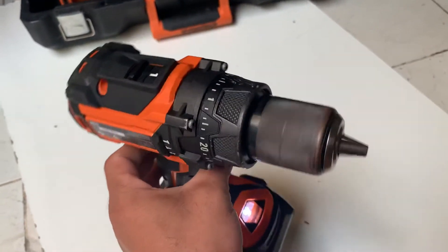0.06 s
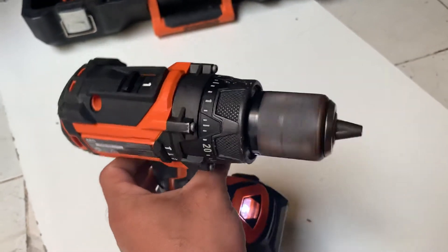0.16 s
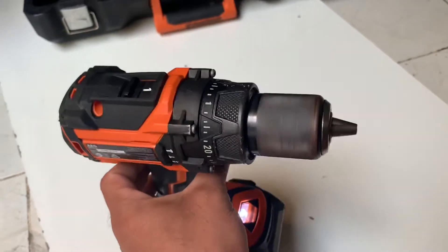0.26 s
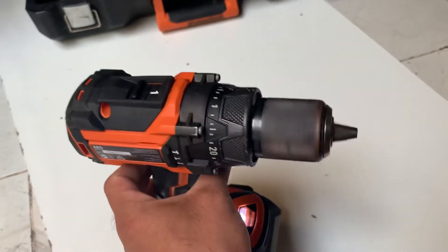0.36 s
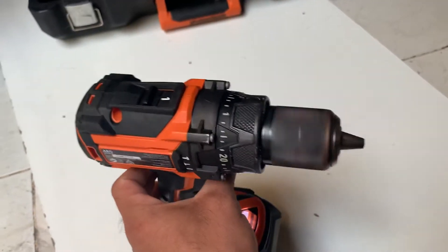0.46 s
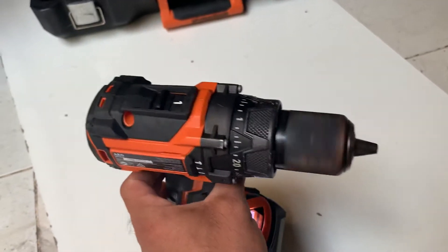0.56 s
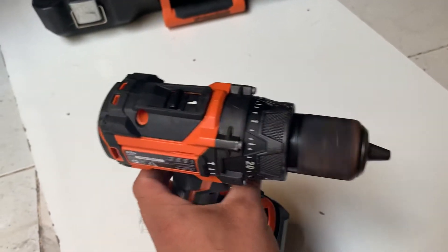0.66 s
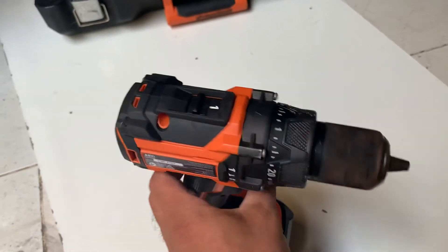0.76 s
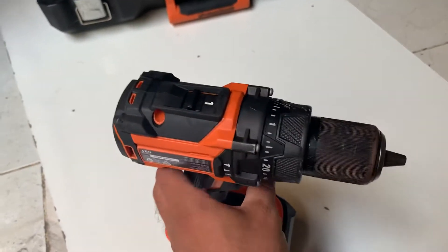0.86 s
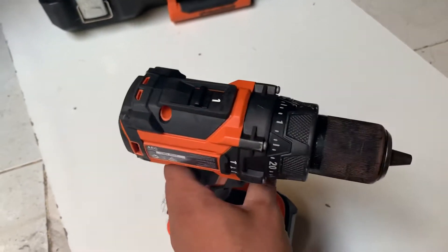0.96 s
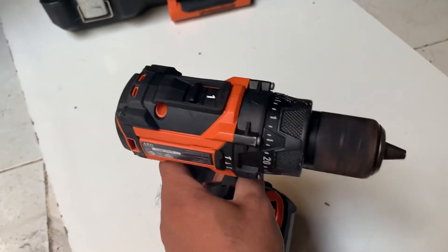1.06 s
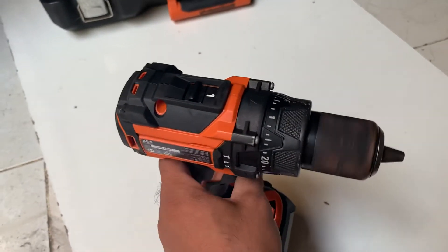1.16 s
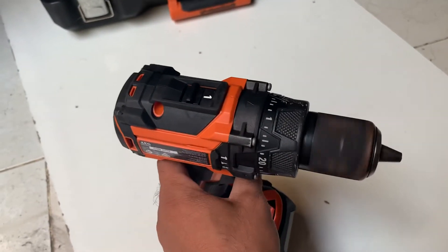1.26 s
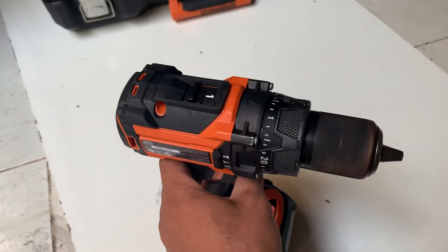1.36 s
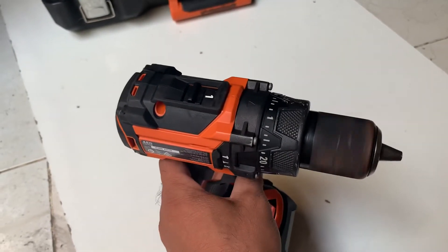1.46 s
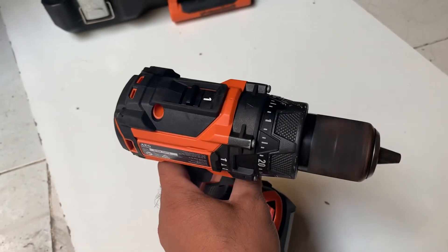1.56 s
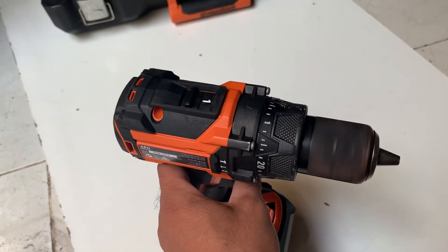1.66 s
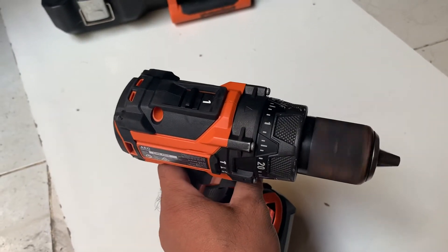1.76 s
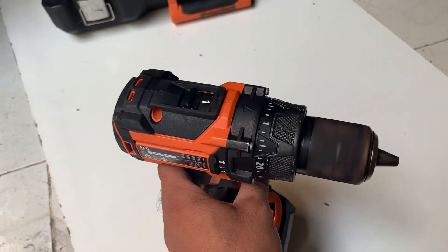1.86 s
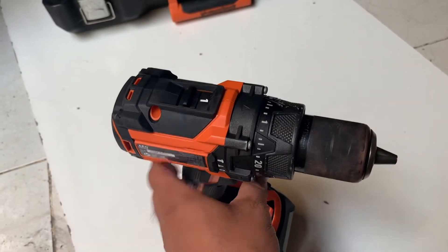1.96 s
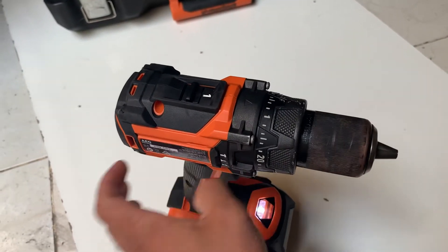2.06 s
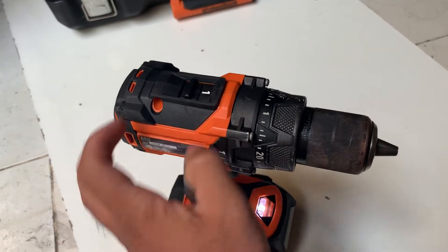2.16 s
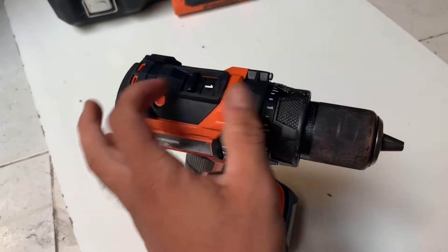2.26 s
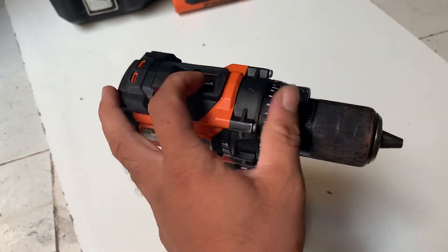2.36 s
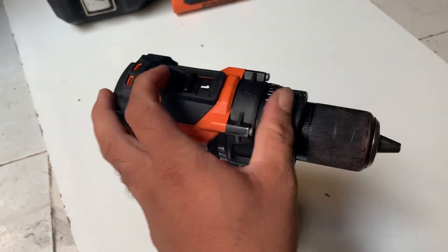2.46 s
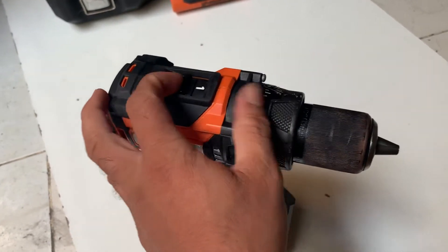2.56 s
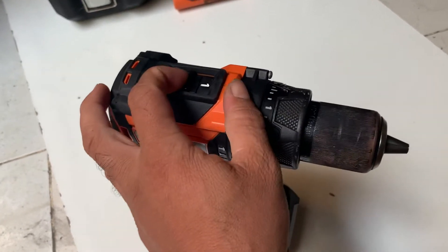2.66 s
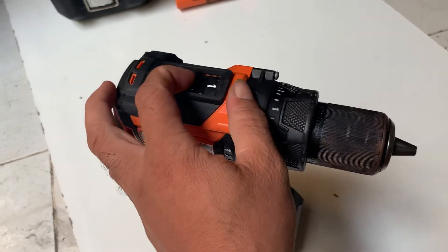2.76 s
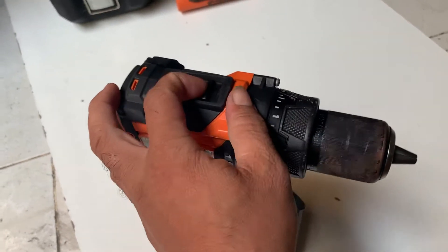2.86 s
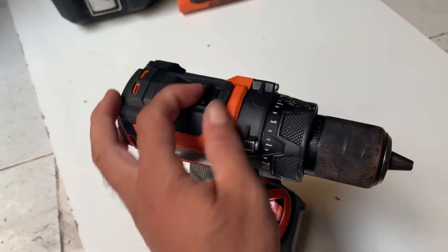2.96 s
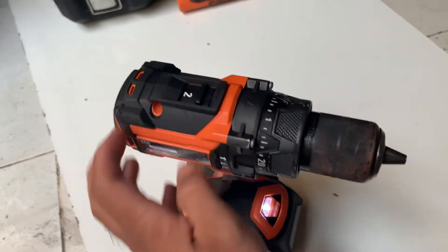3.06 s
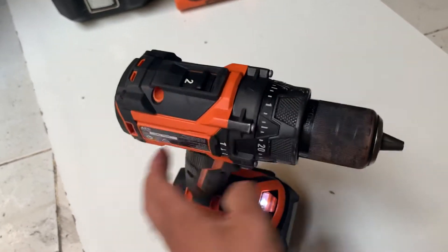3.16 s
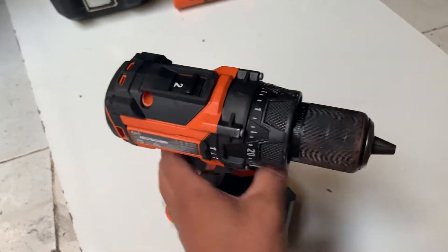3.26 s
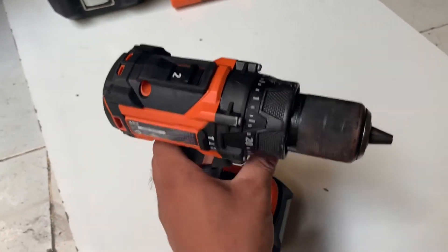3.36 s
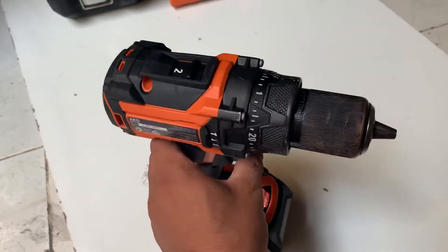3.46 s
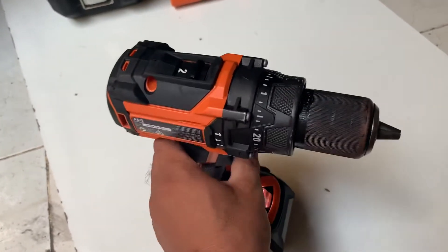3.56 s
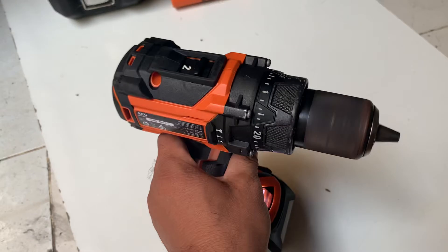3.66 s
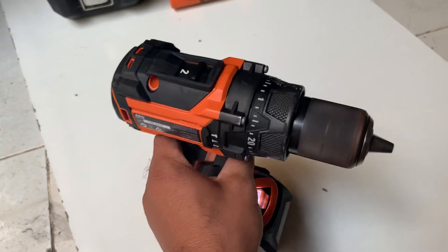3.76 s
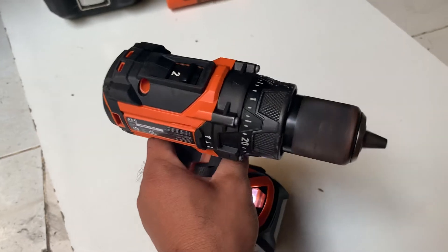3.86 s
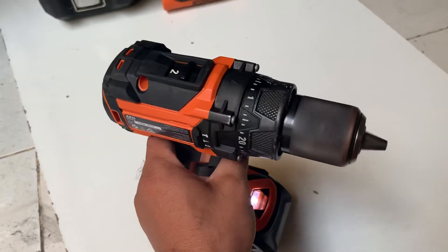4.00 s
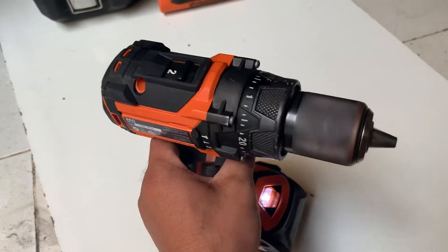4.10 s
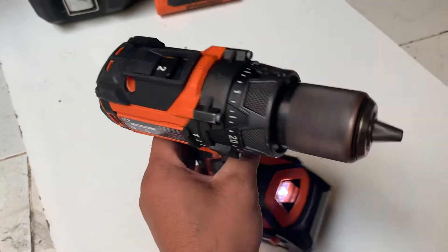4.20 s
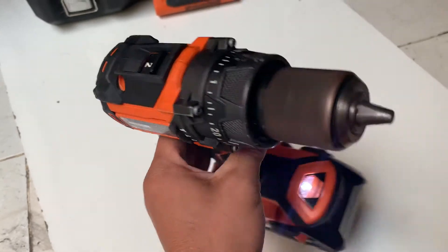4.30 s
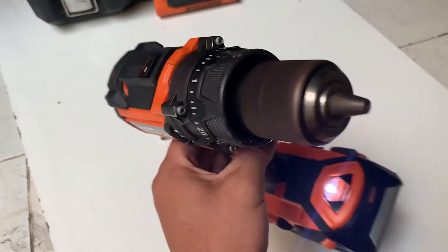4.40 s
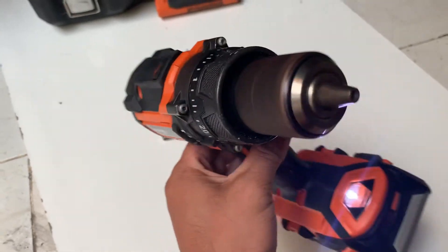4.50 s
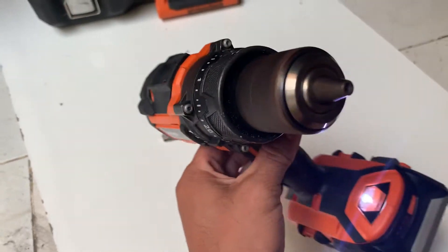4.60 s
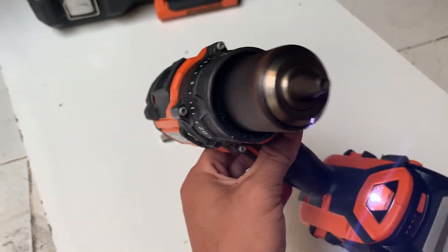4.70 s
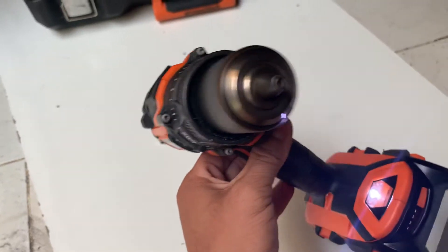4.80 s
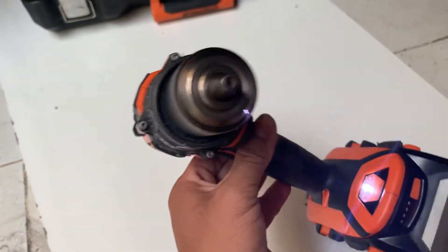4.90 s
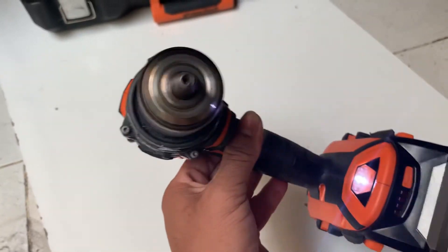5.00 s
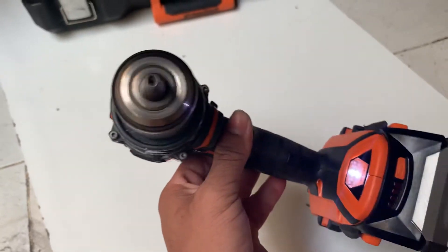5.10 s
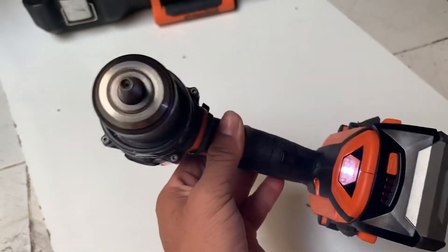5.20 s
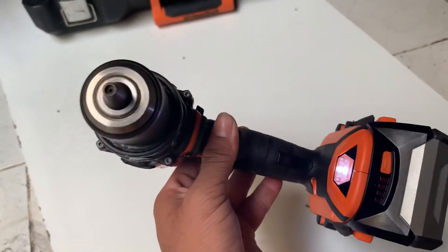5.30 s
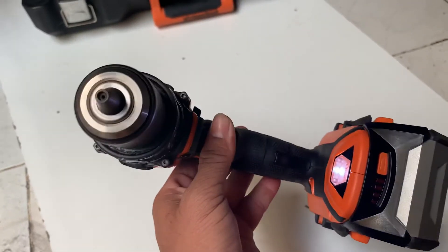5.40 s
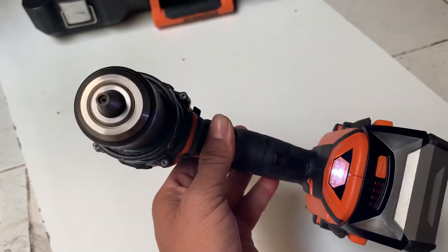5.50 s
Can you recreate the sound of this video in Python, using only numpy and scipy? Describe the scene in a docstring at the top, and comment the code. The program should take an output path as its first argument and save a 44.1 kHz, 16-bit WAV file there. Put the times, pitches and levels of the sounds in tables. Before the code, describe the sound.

A cordless drill whines steadily, brakes, runs and brakes again, then after handling knocks and a sharp selector click whines on to the end.

```python
"""Close to a stereo microphone in a small room, a cordless drill with an empty chuck is already spinning; it is
released and braked, runs and brakes again, and after a pause starts a third run that lasts to the end.
Tones at multiples of the motor speed whine over shaped gear noise; the housing's modes ring as orders sweep past.
The hand knocks and rustles, mostly between the last two runs, where noise bursts snap the gear selector over.
Faint rumble, drone and air lie behind it all; the third run's tone shifts as the chuck swings round."""
import sys
import numpy as np
from scipy import signal
from scipy.fft import rfft, irfft, next_fast_len
from scipy.io import wavfile
from scipy.ndimage import uniform_filter1d, map_coordinates

SR = 44100
rng = np.random.default_rng(int(sys.argv[2]) if len(sys.argv) > 2 else 0)


def file_out(sig):
    """Save sig as 16-bit WAV at sys.argv[1]."""
    # one column per channel
    cols = np.atleast_2d(sig).T
    # limit, then scale
    lim = np.clip(cols, -1, 1)
    pcm = np.round(lim * 32767).astype(np.int16)
    wavfile.write(sys.argv[1], SR, pcm)


N = 244314
TIME = np.arange(N) / SR  # s

# Trigger pulls. Each row: pressed, released and brake engaged in seconds, top speed in turns per s,
# then relative levels of gear rush, gear hiss, hum and cogging in dB.
TRIGGER_PULLS = [(-1, .642, .7, 406, -39.8, -41, -39, -39),
                 (1.048, 1.812, 1.879, 405.8, -40.8, -43.2, -40.7, -43),
                 (3.6, 6, 6.06, 403.6, -37.6, -38.7, -38.3, -39.8)]
# The rotor's whine at the two microphone ports as the drill moves and interference makes quick dips, one list
# for each pull. Each row: time in seconds, relative left and right level in dB, phase lead of the left in radians.
ROTOR_AT_PORTS = [
    [(0.03, -20, -15.5, 2.6), (0.2, -23.5, -17.5, 3.0), (0.29, -29.0, -25.5, 3.4),
     (0.37, -36.0, -28.5, 4.8), (0.46, -28.0, -25.0, 7.1), (0.62, -24.0, -23.5, 7.6),
     (0.71, -18, -16.5, 8.3)],
    [(1.11, -18, -19, 8.3), (1.16, -19.5, -23.0, 7.5), (1.24, -21.0, -21.5, 8.1), (1.275, -21, -26, 9.1),
     (1.35, -21.0, -31.0, 8.3), (1.6, -21.5, -25.0, 7.7), (1.79, -21.0, -25.0, 7.8), (1.89, -20, -20, 8.2)],
    [(3.645, -19, -22, 8.2), (3.67, -22, -25, 8.2), (3.7, -15.5, -18, 8), (3.765, -20, -29, 7.8),
     (3.795, -19.5, -20, 8), (3.83, -19.5, -28, 8.4), (3.87, -18.5, -20, 8.6), (4.05, -20.0, -32.0, 8.1),
     (4.16, -26.5, -30.5, 6.3), (4.23, -36.0, -30.0, 3.3), (4.27, -29.5, -22.5, 2.5),
     (4.43, -24.0, -20.0, 2.5), (4.75, -26.0, -27.5, 1.5), (4.87, -25.0, -27.0, 1.3),
     (5, -24.5, -25.0, 2.1), (5.23, -25.5, -21.0, 2.3), (5.33, -27.0, -25.0, 2.3),
     (5.51, -26.0, -21.5, 2.3)],
]
# How well the housing radiates the rotor's whine. Each row: frequency in Hz, gain in dB.
ROTOR_RADIATION = [(1500, -45), (2050, -22), (2300, -13), (2480, -9), (2610, -9), (2730, 1.5), (2850, 4.5),
                   (2970, 0), (3400, 0)]
# Tooth mesh tone. Each row: time in seconds, relative level in dB.
MESH_LEVEL = [(0.12, -41.5), (0.36, -45), (0.6, -43), (1.28, -42.5), (1.43, -36.0), (1.78, -36.0),
              (3.77, -33), (3.85, -40), (3.92, -35), (4.14, -32.5), (4.34, -32.0), (4.56, -39.0),
              (4.84, -31.0), (5.02, -37.5), (5.13, -33.5), (5.45, -38.0)]
# Planet gear tone. Each row: time in seconds, level in dB before the gears' running gain.
PLANET_TONE_LEVEL = [(1.8, -53), (4.6, -49), (4.655, -38), (4.7, -37), (4.755, -49), (4.79, -36),
                     (4.82, -36), (4.85, -47), (5.04, -47), (5.09, -42), (5.23, -50), (5.27, -41),
                     (5.34, -37.5), (5.43, -42), (5.5, -48)]
# Ring gear tone. Each row: time in seconds, level in dB before the gears' running gain.
RING_TONE_LEVEL = [(1.8, -48), (3.8, -41), (4.24, -38), (4.4, -48)]
# Weaker lines. Each row: multiple of the motor speed, level in dB before the running gain, roughness 0-1.
WEAK_ORDERS = [(2.57, -55, .6), (3, -53, .3), (3.47, -55, .6), (5, -53, .3), (7, -58, .4), (9.3, -57, .5),
               (10, -57, .4), (11, -56, .4), (12, -44, .35), (15, -60, .4), (16, -49, .2), (20, -47, .25),
               (22.5, -63, .4), (24, -59, .2), (32, -56.5, .2), (38, -65, .3)]
# Torque ripple that shakes the housing. Each row: multiple of the motor speed, drive in dB, roughness 0-1.
RIPPLE_ORDERS = [(4, -28.5, .22), (12, -42, .6), (16, -29, .35), (19, -38, .5), (24, -45, .7)]
# Modes of the drill's housing. Each row: frequency in Hz, width in Hz, gain in dB.
HOUSING_MODES = [(760, 220, 0), (1020, 260, 0), (1380, 280, -9), (2510, 120, -9), (2780, 130, 1),
                 (2900, 140, 1), (3050, 130, 0), (4080, 400, -3), (4750, 400, 0), (5750, 500, -7),
                 (6950, 600, 0)]
# Spectrum of the gear rush. Each row: frequency in Hz, relative density in dB per Hz.
RUSH_SPECTRUM = [(150, -12), (260, -5), (350, -6), (520, -22), (700, -4.5), (950, 2), (1350, -2),
                 (1700, 0.5), (2400, -0.5), (2950, 1.5), (3500, -6.5), (4600, -23)]
# Spectrum of the gear hiss, with a hole near 11.6 kHz as lossy coding leaves.
# Each row: frequency in Hz, relative density in dB per Hz.
HISS_SPECTRUM = [(2500, -25), (3500, -5.5), (4200, 3.5), (4900, 1.5), (5500, -3), (7200, -7), (8200, -6),
                 (9300, -8.5), (10500, -11), (11600, -29), (14200, -17), (15600, -39)]
# Spectrum of gears clattering under torque. Each row: frequency in Hz, relative density in dB per Hz.
CLATTER_SPECTRUM = [(200, -19), (400, 0.5), (620, -9), (900, 4.5), (1300, -5), (2000, -7), (2900, 6),
                    (3500, -7), (4500, -3), (6500, -11), (10000, -26.5), (15000, -86)]
# Short bursts near 3 kHz as the motor starts, brakes and stops. Each row: time in seconds, relative level in dB.
START_STOP_BURSTS = [(0.698, -28), (0.754, -26), (0.769, -22), (0.783, -27), (1.064, -26), (1.073, -20.5),
                     (1.878, -25), (1.902, -25), (1.932, -28), (1.949, -24), (1.962, -25), (3.601, -34),
                     (3.609, -25), (3.620, -16)]
# Spectrum of the short bursts. Each row: frequency in Hz, relative density in dB per Hz.
BURST_SPECTRUM = [(400, -21.5), (900, -9.5), (1400, -27.5), (2400, -18.5), (2900, 8), (3400, -5.5),
                  (4700, -14), (9000, -27.5), (15000, -46)]
# The selector scrapes, snaps home and settles.
# Each row: start in seconds, relative level in dB, t60 in seconds, brightness in dB per octave.
SELECTOR_CONTACTS = [(2.823, -32, .05, -1), (2.827, -26, .02, 0), (2.8294, -13, .007, 2),
                     (2.8308, -14, .019, -1.5), (2.84, -35, .07, -1.5)]
# The selector's plastic shell. Each row: frequency in Hz, relative density in dB per Hz.
SELECTOR_SHELL = [(350, -50), (620, -28), (730, -7), (820, 3), (1000, 2), (1320, -6), (1600, -5),
                  (2050, -8), (2600, -4), (4300, -3), (7000, -11), (9400, -9), (12000, -17), (15500, -16)]
# Knocks of the hand, from dull thuds to light taps. Each row: start in seconds, level in dB, pitch in Hz.
HAND_KNOCKS = [(0.826, -39, 300), (0.84, -37, 110), (0.883, -44, 300), (0.958, -43, 280), (1.006, -40, 270),
               (1.03, -38, 90), (2.04, -40, 80), (2.086, -43, 320), (2.117, -39, 430), (2.127, -35, 380),
               (2.13, -35, 65), (2.164, -44, 320), (2.277, -39, 520), (2.302, -37, 150), (2.318, -34, 300),
               (2.344, -32, 340), (2.46, -41, 350), (2.506, -36, 270), (2.96, -36, 100), (3.074, -41, 420),
               (3.1, -33, 200), (3.133, -33, 170), (3.182, -32, 210), (3.24, -34, 100), (3.366, -40, 430),
               (3.413, -35, 180), (3.47, -34, 200), (3.483, -36, 110), (4.342, -28, 70), (4.584, -37, 270),
               (4.957, -39, 170), (5.288, -38, 55), (5.331, -33, 120), (5.358, -31, 290), (5.399, -39, 240)]
# The hand slides over the grip. Each row: start in seconds, length in seconds, rustle in dB.
HAND_SLIDES = [(2.08, .25, -55), (2.37, .17, -55), (3.03, .17, -53), (3.29, .2, -53)]
# Spectrum of the rustle. Each row: frequency in Hz, relative density in dB per Hz.
RUSTLE_SPECTRUM = [(150, -8), (270, 4), (450, -5), (550, -7), (660, -11), (820, -19), (1200, -34), (5000, -75)]
# Skin drags over the rubber grip. Each row: start in seconds, length in seconds, level in dB.
SKIN_SCRAPES = [(1.98, .14, -54), (2.14, .16, -52.5)]
# The grip's resonances. Each row: frequency in Hz, relative density in dB per Hz.
GRIP_RESONANCES = [(380, -22), (500, -7), (545, 0), (620, -13), (720, -16), (795, -7), (900, -20),
                   (1300, -34), (4000, -70)]
# Swells of the low background. Each row: middle and half length in seconds, rumble and drone rise in dB.
BACKGROUND_SWELLS = [(0.85, .2, 2, 2), (1.83, .07, 6.5, 1), (3.2, .5, 0, 8.5), (5.2, .4, -3, -2)]
# Spectra of rumble, drone and air. Each row: frequency in Hz, relative density in dB per Hz.
RUMBLE_SPECTRUM = [(15, -33), (35, -7.5), (55, 1), (85, 1.5), (125, -5.5), (250, -45), (1000, -89)]
DRONE_SPECTRUM = [(80, -25), (125, -6), (150, -5), (172, 0), (205, -10), (280, -15), (450, -32), (1500, -80)]
AIR_SPECTRUM = [(100, -5.5), (700, 4), (1500, -0.5), (4300, -9.5), (7000, -20), (10000, -33), (14000, -49)]
# The small room's decay. Each row: frequency in Hz, t60 in seconds.
ROOM_DECAY = [(200, 0.48), (1000, 0.19), (4000, 0.23), (12000, 0.15)]

# multiples of the motor speed for the leading tones
ROTOR, COG, COG_SIDEBAND, PLANET, RING, TEETH = 8, 4, 4.08, 2.883, 10.21, 19
# the motor nears its top speed quickly, then creeps up the last few per cent
SPIN_UP_S, CREEP_SHARE, CREEP_S = .046, .055, .11
# released, it coasts; then the brake bites and at last the spindle locks (rates in turns per s per s)
COAST_RATE, BRAKE_RATE, STOP_S, LOCK_S = 500, 2480, .104, .023
# the rotor's whine follows the current: weak while coasting, strong while braking
COAST_DB, BRAKE_DB = -10, 1
HUM_RISE_S = .17  # the hum builds up after each pull
# the chuck swings round to face the microphone; full change of each layer (the octave's adds to the hum's)
TURN_START_S, TURN_LENGTH_S = 4.3, .9
TURN_RUSH_DB, TURN_HISS_DB, TURN_HUM_DB, TURN_OCTAVE_DB, TURN_COG_DB = -3.5, -3.6, -4, -3, 2
LEAK_DB = -20  # ripple that escapes between the housing's modes
SLIDE_FADE_S, GRIP_DB, SLIPS_PER_S = .02, -62, 750
BUMP_CYCLES = .36  # the palm damps each knock within a fraction of a cycle
RUMBLE_DB, DRONE_DB, AIR_DB = -47.8, -49.3, -58
TOP_HZ = 15500


def motor():
    """Speed in turns per s, shaft angle, share of full speed and torque (speeding up or braking)."""
    pressed, released, braked, top, *_ = per_pull()
    age = TIME - pressed
    driven = top * np.tanh(age / SPIN_UP_S) * (1 - CREEP_SHARE * np.exp(-age / CREEP_S))
    coast_loss = COAST_RATE * np.clip(TIME - released, 0, braked - released)
    brake_loss = BRAKE_RATE * np.maximum(TIME - braked, 0)
    lock = np.clip((braked + STOP_S - TIME) / LOCK_S, 0, 1)
    speed = np.maximum(driven - coast_loss - brake_loss, 0) * lock
    pace = np.clip(speed / speed.max(), 0, 1)
    change = np.abs(uniform_filter1d(np.gradient(pace) * SR, size=500))
    torque = np.tanh(change / 5.7) * np.minimum(pace / 0.53, 1)
    # the shaft turns less evenly under torque
    flutter = .00025 * wobble(14) + .0005 * wobble(160) + .006 * torque * wobble(500)
    angle = 2 * np.pi * np.cumsum(speed * (1 + flutter)) / SR
    return speed, angle, pace, torque


def per_pull():
    """For each column of the pulls, the value of the latest pull at every sample."""
    rows = np.array(TRIGGER_PULLS)
    latest = np.searchsorted(rows[:, 0], TIME, side="right") - 1
    return rows[latest].T


def current_db():
    """How the motor current changes the whine: it drops out on release and surges in the brake."""
    _, released, braked, *_ = per_pull()
    steps = np.select([TIME > braked, TIME > released], [BRAKE_DB, COAST_DB], 0.)
    return uniform_filter1d(steps, size=600)


def turned():
    """How far the chuck has swung towards the microphone, 0-1."""
    return np.clip((TIME - TURN_START_S) / TURN_LENGTH_S, 0, 1)


def rotor(speed, angle, pace):
    """The main whine, driven by the current; it flares as it sweeps through the strongest resonance."""
    left_db, right_db, lead = curves(np.vstack(ROTOR_AT_PORTS))
    drive_db = current_db() + along(ROTOR_RADIATION, ROTOR * speed)
    tone = amp(drive_db) * line(ROTOR * angle, rough=0.057, lead=lead, drift_db=0.25)
    # random flicker for the tone beating against its own echo until the speed settles
    beating_db = np.tanh((1 - pace) / .04) * (2.8 * np.array([wobble(110), wobble(110)]) - .7)
    port_gain = amp(np.array([left_db, right_db]) + beating_db + .1)
    return port_gain * np.minimum(2 * pace, 1) * tone


def whine(angle, pace, torque):
    """Hum, cogging and gear tones, all locked to the shaft."""
    pressed, *_, hum_db, cog_db = per_pull()
    hum_rise = 1 - np.exp((pressed - TIME) / HUM_RISE_S)
    hum_db = hum_db + TURN_HUM_DB * turned()
    octave_db = hum_db - 9.5 + TURN_OCTAVE_DB * turned()
    cog_db = cog_db + TURN_COG_DB * turned()
    mesh_db, = curves(np.vstack(MESH_LEVEL))
    mesh_db = mesh_db + 2.3 + .7 * np.minimum(current_db(), 0)
    planet_db, = curves(PLANET_TONE_LEVEL)
    ring_db, = curves(RING_TONE_LEVEL)
    tones = amp(hum_db + .3) * hum_rise * line(angle, rough=0.24, lead=0.27, drift_db=.7)
    tones += amp(octave_db) * line(2 * angle, rough=.2, lead=.15, drift_db=1)
    tones += amp(cog_db - 1.5) * line(COG * angle, rough=0.36, lead=wobble(1.97), drift_db=1.2)
    tones += amp(cog_db - 2.2) * line(COG_SIDEBAND * angle, rough=3.9, lead=4.3 * wobble(3), drift_db=2.5)
    tones += amp(planet_db) * line(PLANET * angle, rough=.4, lead=.5, drift_db=.7)
    tones += amp(ring_db) * line(RING * angle, rough=.3, lead=0.42 + .5 * wobble(2.2), drift_db=1)
    tones += amp(mesh_db) * line(TEETH * angle, rough=.18, lead=1.9 + .15 * wobble(2), drift_db=.6)
    for order, db, rough in WEAK_ORDERS:
        # short waves arrive at the two ports further out of step
        lead = min(order / 14, 1) * (1 + .4 * wobble(1.5))
        tones += amp(db) * line(order * angle, rough, lead=lead, drift_db=1.1)
    # the fine lines only form once the gears run freely
    return pace ** 3 * (1 - torque) ** 1.5 * tones


def ripple(speed, angle, torque):
    """While the motor speeds up or brakes, each order chirps through the housing's modes."""
    drive = np.zeros((2, N))
    for order, db, rough in RIPPLE_ORDERS:
        radiated = 1 / (1 + (650 / (order * speed + 1)) ** 6)  # little radiates below 650 Hz
        tone = line(order * angle, rough, lead=1.1, drift_db=1.2)
        drive += amp(db + 1.6 * wobble(140)) * radiated * tone
    drive *= torque ** 1.3
    return housing(drive) + amp(LEAK_DB) * drive


def housing(x):
    """The housing's modes ring on after a tone has swept past them, and beat against it."""
    def response(f):
        total = 0
        for k, (hz, width, db) in enumerate(HOUSING_MODES):
            mode = 1j * f * width / (hz ** 2 - f ** 2 + 1j * f * width)
            total = total + (-1) ** k * amp(db) * mode
        return total
    return filtered(x, response)


def gears(angle, pace, torque):
    """Teeth rub and tick once a turn; under torque they clatter; short bursts mark starts and stops."""
    *_, rush_db, hiss_db, _, _ = per_pull()
    rush_db = rush_db + TURN_RUSH_DB * turned() + 2.0
    hiss_db = hiss_db + TURN_HISS_DB * turned() + 6.0
    grain = amp(0.75 * wobble(900) + 1.4 * wobble(40) + 0.63 * np.cos(angle))
    rush = amp(rush_db) * noise(RUSH_SPECTRUM, alike=0.033)
    rush = rush + amp(hiss_db) * noise(HISS_SPECTRUM, alike=.05)
    chatter = unit(amp(3.3 * wobble(400)))
    clatter = noise(CLATTER_SPECTRUM, alike=.3, envelope=amp(-28.5) * chatter * torque ** 1.6)
    burst_envelope = sum(amp(db) * burst(s, t60=0.027) for s, db in START_STOP_BURSTS)
    short_bursts = noise(BURST_SPECTRUM, alike=0.31, envelope=uniform_filter1d(burst_envelope, size=180))
    rubbing = pace ** 1.4
    balance = amp([[-.7], [.7]])  # the rush leans to the right
    return rubbing * grain * rush * balance + clatter + short_bursts


def selector():
    """The plastic slider's contacts excite many short modes of the shell."""
    out = np.zeros((2, N))
    for s, db, t60, bright_db in SELECTOR_CONTACTS:
        colour = [(hz, level + bright_db * np.log2(hz)) for hz, level in SELECTOR_SHELL]
        out += noise(colour, alike=0.25, envelope=amp(db - 4) * burst(s, t60))
    return out


def hand():
    """Knocks, short scrapes and a grainy rustle as the grip shifts."""
    knocks = sum(amp(db) * knock(s, hz) for s, db, hz in HAND_KNOCKS)
    rustle_envelope = (amp(GRIP_DB) + strokes(HAND_SLIDES)) * slips(SLIPS_PER_S)
    rustle = noise(RUSTLE_SPECTRUM, alike=0.95, envelope=rustle_envelope)
    scrape = noise(GRIP_RESONANCES, alike=.9, envelope=strokes(SKIN_SCRAPES) * slips(SLIPS_PER_S))
    return knocks + scrape + rustle


def knock(start, hz):
    """One heavily damped swing of the grip, peak near 1."""
    cycles = np.arange(SR // 10) / SR * hz
    envelope = cycles / BUMP_CYCLES * np.exp(1 - cycles / BUMP_CYCLES)
    swing = np.sin(2 * np.pi * cycles) * envelope
    return np.pad(swing, (int(start * SR), N))[:N]


def strokes(rows):
    """The envelope of sliding contacts that fade in and out."""
    total = 0
    for s, length, db in rows:
        to_edge = np.minimum(TIME - s, s + length - TIME)
        total = total + amp(db) * np.clip(to_edge / SLIDE_FADE_S, 0, 1)
    return total


def slips(rate):
    """Tiny slips of random size at random moments, rms 1."""
    return unit((rng.random(N) < rate / SR) * rng.uniform(.3, 1, N))


def background():
    """Low rumble, a distant drone and faint air, each made of coloured noise."""
    rise_db = np.zeros((2, N))
    for s, half_length, *gains_db in BACKGROUND_SWELLS:
        rise_db += np.outer(gains_db, np.exp(-((TIME - s) / half_length) ** 2))
    rumble = amp(RUMBLE_DB + rise_db[0] + 2.3 * wobble(11)) * noise(RUMBLE_SPECTRUM, alike=0.6)
    drone = amp(DRONE_DB + rise_db[1] + 1.2 * wobble(12)) * noise(DRONE_SPECTRUM, alike=.05)
    air = amp(AIR_DB) * noise(AIR_SPECTRUM, alike=0.044)
    return rumble + drone + air


def room(x):
    """A short diffuse tail from hard walls: noise that decays at its own rate in each band."""
    hz, t, z = signal.stft(rng.standard_normal((2, SR // 2)), SR, nperseg=256)
    decay = amp(-60 * t / along(ROOM_DECAY, hz)[:, None])
    tail = signal.istft(z * decay, SR, nperseg=256)[1]
    return signal.fftconvolve(x, tail / np.linalg.norm(tail[0]), axes=1)[:, :N]


def line(angle, rough, lead, drift_db):
    """A stereo tone of rms 1 with a noisy skirt; its strength drifts at each port."""
    skirt = wobble(70) + 1j * wobble(70) + .5 * (wobble(450) + 1j * wobble(450))
    tone = (1 + rough * skirt / np.sqrt(2)) * np.exp(1j * (angle + 2 * np.pi * rng.random()))
    ports = [amp(drift_db * wobble(2.4)) * (tone * np.exp(.5j * side * lead)).real for side in (1, -1)]
    return unit(np.array(ports))


def noise(spectrum, alike, envelope=1):
    """Stereo noise, rms 1 if unshaped, enveloped before colouring; alike is the left-right correlation."""
    colour = lambda hz: unit(amp(along(spectrum, hz)))
    mid, side = filtered(envelope * rng.standard_normal((2, N)), colour)
    turn = np.arccos(np.clip(alike, -1, 1)) / 2
    return np.cos(turn) * mid + np.sin(turn) * np.array([side, -side])


def burst(start, t60):
    """An envelope that starts at once and dies away."""
    age = TIME - start
    return (age >= 0) * amp(-60 * np.abs(age) / t60)


def wobble(rate):
    """A smooth random curve, rate knots a second."""
    knots = rng.standard_normal(int(N * rate / SR) + 4)
    grid = np.arange(0, len(knots) - 1, .1)
    return np.interp(TIME * rate, grid, map_coordinates(knots, [grid]))


def filtered(x, response):
    """x times a response of frequency."""
    m = next_fast_len(N + SR // 2)
    return irfft(rfft(x, m) * response(np.fft.rfftfreq(m, 1 / SR)), m)[..., :N]


def along(points, hz):
    """Read (Hz, value) points on a log frequency axis."""
    f, v = np.transpose(points)
    return np.interp(np.log(hz + 1), np.log(f + 1), v)


def curves(rows):
    """One value per sample for each column after the time."""
    s, *cols = np.transpose(rows)
    return [np.interp(TIME, s, c) for c in cols]


def amp(db):
    """Amplitude of a level in dB."""
    return 10 ** (np.asarray(db) / 20)


def unit(x):
    """x scaled to rms 1."""
    return x / np.sqrt(np.mean(x ** 2) + 1e-20)


def scene():
    """The drill, the selector and the hand in a small room."""
    speed, angle, pace, torque = motor()
    main = rotor(speed, angle, pace)
    tones = main + whine(angle, pace, torque)
    rattle = gears(angle, pace, torque) + ripple(speed, angle, torque)
    click = selector()
    # the room answers the rotor more strongly under torque
    to_room = amp(-27.5) * tones + amp(-21) * torque * main + amp(-12.5) * rattle + amp(-12) * click
    return tones + rattle + click + room(to_room) + hand() + background()


def record(dry):
    """The microphone keeps nothing above its band limit."""
    return filtered(dry, lambda hz: hz < TOP_HZ)


dry = scene()
out = record(dry)
file_out(out)
```